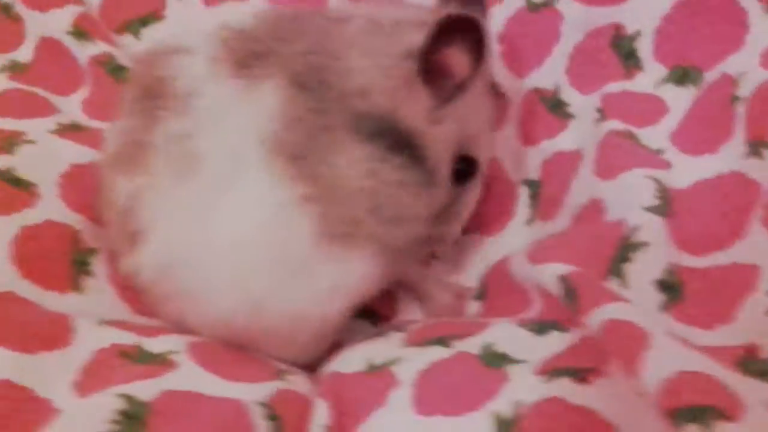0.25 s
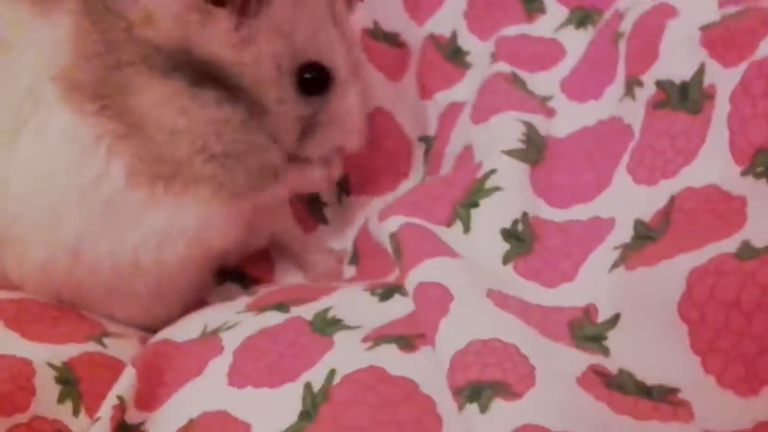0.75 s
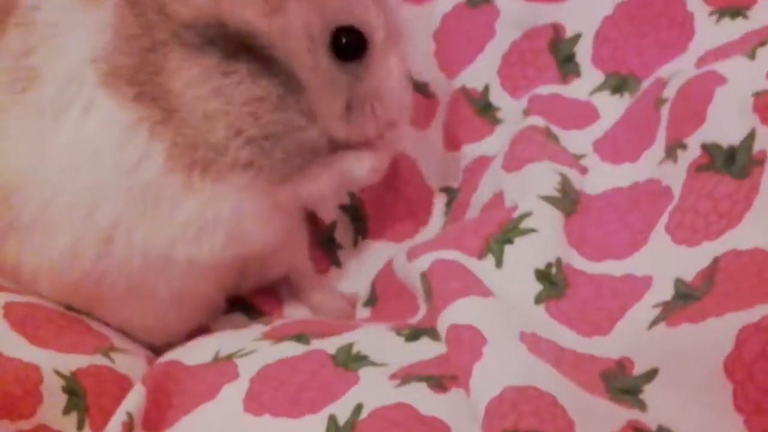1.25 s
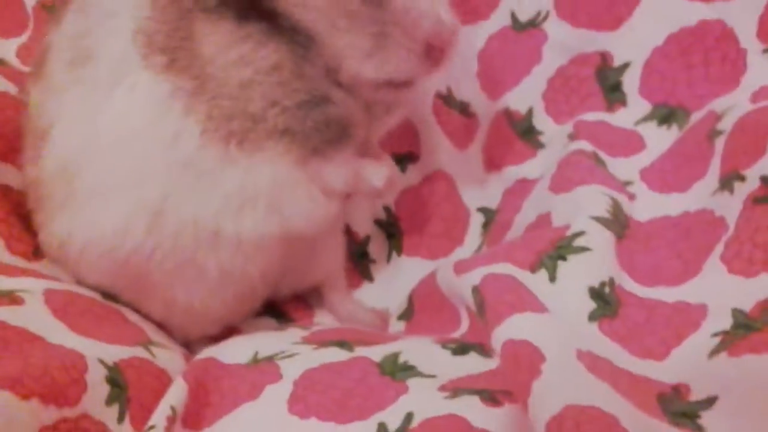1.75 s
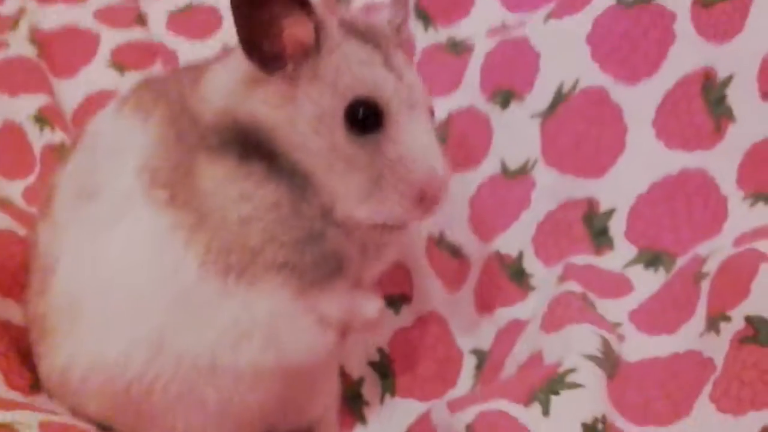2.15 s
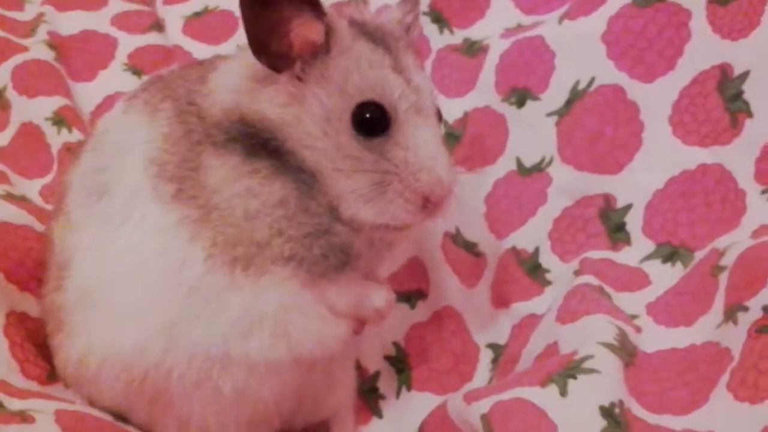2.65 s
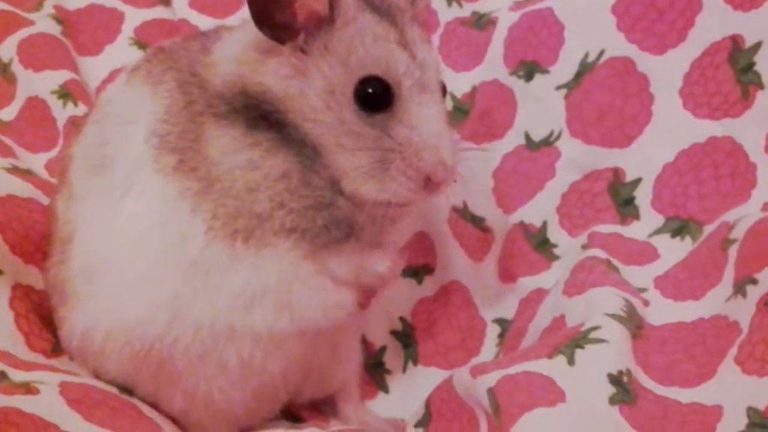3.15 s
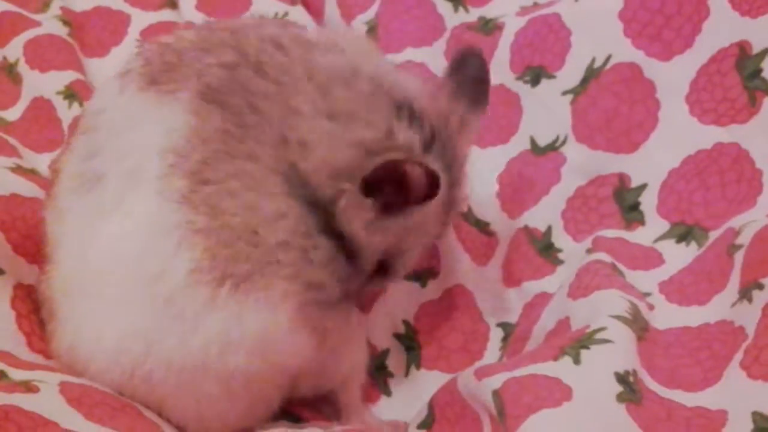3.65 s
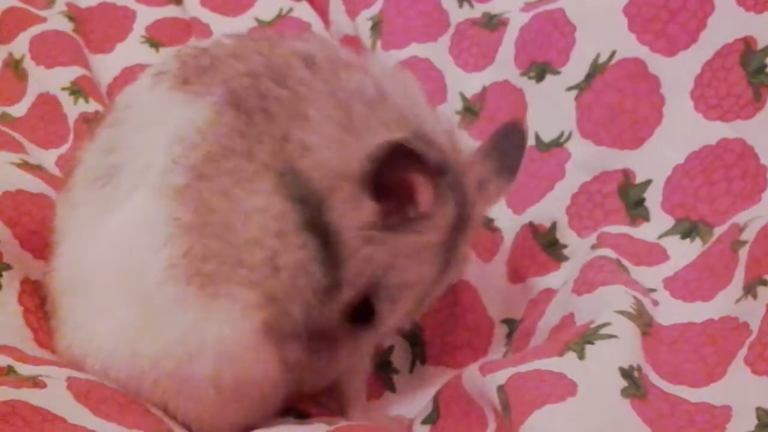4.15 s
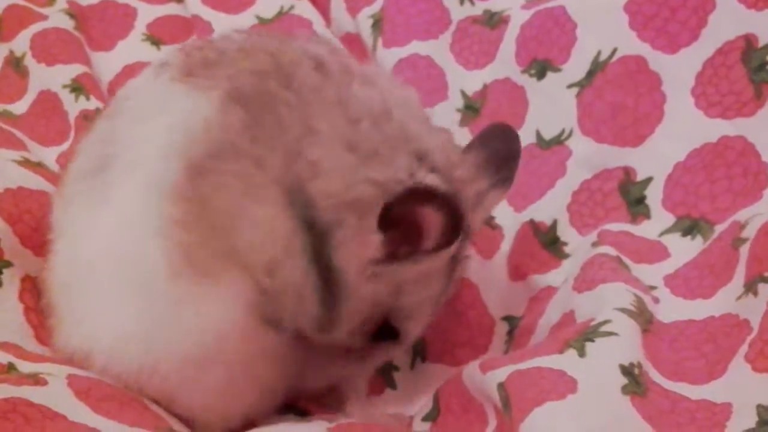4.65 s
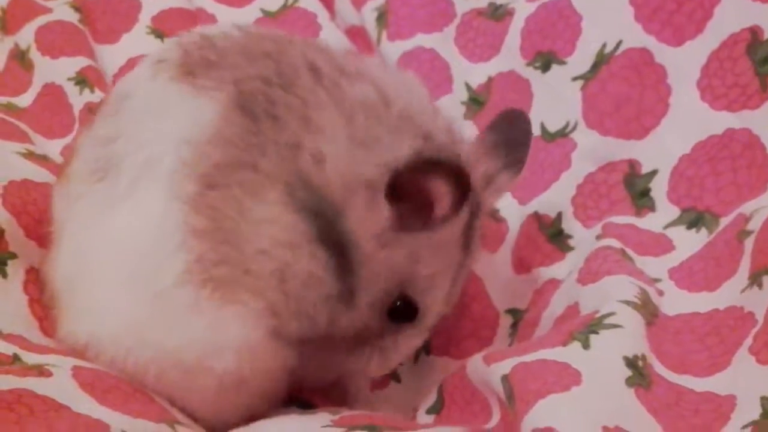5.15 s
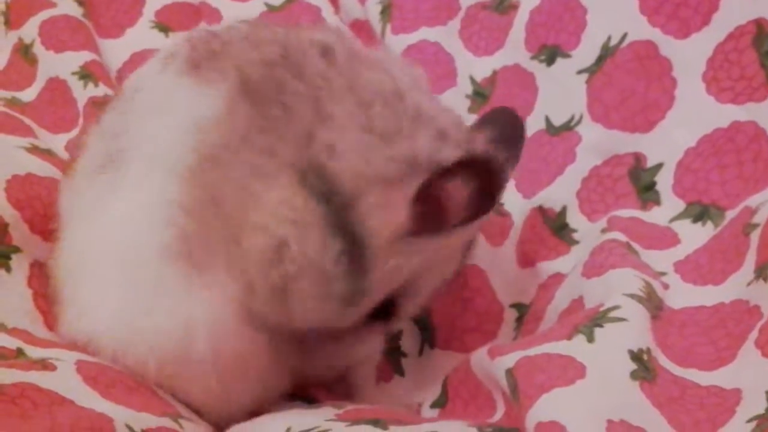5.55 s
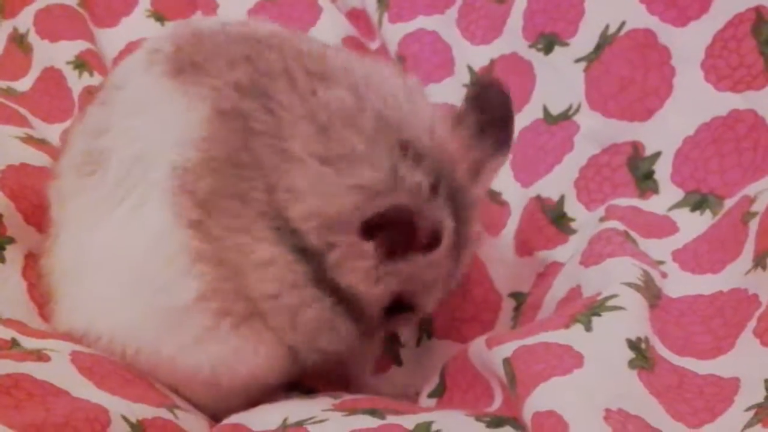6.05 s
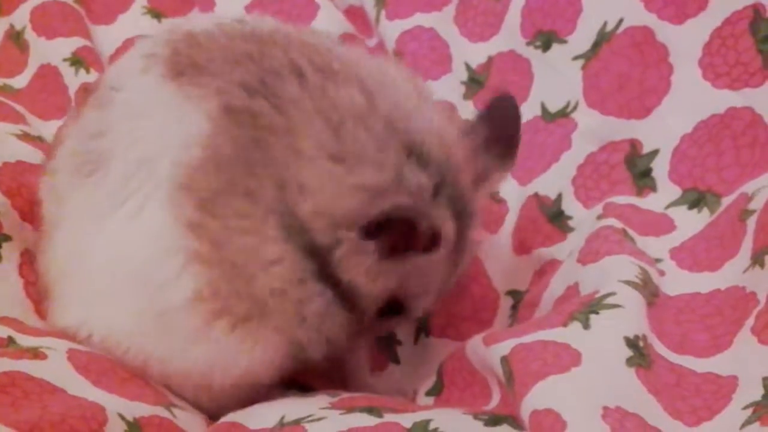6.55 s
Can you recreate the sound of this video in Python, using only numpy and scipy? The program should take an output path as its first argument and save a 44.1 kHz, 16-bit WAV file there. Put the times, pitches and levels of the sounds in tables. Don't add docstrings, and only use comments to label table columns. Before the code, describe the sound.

Very close, dry handling sounds dominate: an opening bump with scraping fabric, irregular plastic clicks and stick-slip creaks, thickening into a rapid crackly creak around two seconds. A faint airy slide trails off. Two hard knocks rattle a loose part, a weaker one follows, then quiet hiss holds a small squeaky wet chirp, another knock and delicate lick clicks from a grooming hamster.

```python
import sys
import numpy as np
from scipy import signal
from scipy.fft import rfft, irfft
from scipy.io import wavfile
from scipy.ndimage import uniform_filter1d, minimum_filter1d

SR = 44100
rng = np.random.default_rng(int(sys.argv[2]) if len(sys.argv) > 2 else 0)


def elevation(decibels):
    levels = np.asarray(decibels, float)
    return 10 ** (levels / 20)


def digitize_waveform(pressure):
    field = np.atleast_2d(pressure).T
    bounded = np.clip(field, -1, 1)
    quanta = np.round(bounded * 32767).astype(np.int16)
    wavfile.write(sys.argv[1], SR, quanta)


N = 299645

# time in seconds, rubbing level in dB, brightness in dB.
RUSTLE = [(0, -33.5, -3.5), (.048, -45.5, 5.5), (.144, -53.5, 7.5), (.25, -61.5, 6.5), (.78, -61, -1),
          (.8, -59, -2.5), (1.145, -62, -4), (1.155, -71, -4), (1.198, -70.5, 4), (1.21, -66.5, 2),
          (1.6, -59.5, -2), (1.62, -63.5, -0.5), (1.755, -61, -4), (1.9, -74, 0), (2.17, -59, 3.5),
          (2.34, -63, 0), (2.49, -70, -11), (2.75, -79.5, -14.5)]
# frequency in Hz, level in dB.
WEAVE = [(71, -50), (120, -17), (235, -8.5), (578, -4.5), (653, -5.5), (1130, -4.5), (2090, 0.5),
         (2780, -3), (4920, -5.5), (5800, -15), (8040, -12), (9860, -22), (15800, -25.5)]
SEAMS_HZ = [1130, 3400, 6000]
# level in dB, share of the brightness (0 to 1).
BANDS = [(-6.5, .1), (-0.06, .01), (-6, 1), (-9.5, 0.31)]
# frequency in Hz, level in dB.
HISS = [(11, -26.5), (18, -5), (28, -22), (70, -21), (101, -15), (324, -20.5), (363, -16.5), (540, -17.5),
        (605, -16.5), (1230, -17), (1380, -15), (3710, -26), (7330, -28), (15800, -28.5)]
HISS_DB = -69.5

# time in seconds, peak level in dB, ring frequency in Hz.
REGRIP = [(.0186, -24, 947.6), (.0306, -22.5, 593), (.041, -40, 675), (.0905, -25, 472), (.178, -38.5, 396),
          (.2727, -37, 770), (.5525, -43, 296), (.5683, -37, 964), (.5803, -36.5, 567), (.6233, -41, 726),
          (.6917, -44.5, 850), (1.5662, -42.5, 668), (1.5767, -39, 620), (1.7518, -42, 564),
          (1.759, -46.5, 736)]
SHIFT = [(.8105, -37.5, 574), (.8337, -34.5, 1007), (.8564, -30.5, 710), (.9215, -27.5, 1050),
         (.9411, -35.5, 830), (.9646, -32, 850), (.9842, -37, 563), (.9973, -35, 775), (1.0176, -37, 512),
         (1.1162, -31.5, 470), (1.1369, -35, 920), (1.2044, -29, 463), (1.2171, -27.5, 520),
         (1.2277, -29.5, 499), (1.2361, -34.5, 403), (1.2465, -36, 380), (1.2544, -41, 447),
         (1.2704, -36.5, 410)]
TIGHTEN = [(1.9022, -49.5, 721), (1.918, -45, 640), (1.9363, -39.5, 373), (1.9449, -36.5, 470),
           (1.9586, -38, 595), (1.9878, -41, 490), (1.9972, -32.5, 740), (2.0047, -42, 550),
           (2.0125, -51, 620), (2.0246, -50, 710), (2.0463, -39.5, 830), (2.0597, -33, 676),
           (2.5465, -36, 536), (2.5606, -40, 627), (2.5675, -32.5, 700), (2.5912, -24, 487),
           (2.6026, -24.5, 700), (2.6114, -35, 815), (2.6152, -37, 578), (2.6699, -42.5, 1306)]
CREAK = [(2.0761, -19.5, 830), (2.0853, -16.5, 844), (2.0907, -28.5, 620), (2.1054, -17.5, 945),
         (2.1159, -16.5, 845), (2.1297, -21, 850), (2.143, -15, 860), (2.152, -18.5, 790),
         (2.1668, -14.5, 980), (2.177, -15.5, 990), (2.1809, -35, 383), (2.2083, -31, 690),
         (2.2177, -34, 540), (2.2241, -29, 610), (2.2275, -32, 620), (2.2448, -21, 740),
         (2.2565, -31.5, 510), (2.2661, -30, 740), (2.2763, -20, 730), (2.2818, -21.5, 780),
         (2.2968, -18.5, 920), (2.3266, -38.5, 810)]
SETTLE = [(2.872, -52, 510), (2.9345, -46, 548), (3.0032, -55, 860), (3.3157, -18.5, 460),
          (3.3801, -32.5, 700), (3.3943, -31.5, 710), (3.5016, -16, 560), (3.5038, -19, 900),
          (3.5056, -24, 727), (3.5182, -30, 700), (3.5484, -29, 650), (3.5514, -22, 870),
          (3.5635, -31.5, 747), (4.2965, -51.5, 790), (4.3738, -33, 553), (4.3767, -25.5, 605),
          (4.3901, -42, 620), (5.5794, -48, 567), (5.7336, -55, 850), (5.7784, -46, 1010),
          (5.8125, -28.5, 650)]
# time in seconds, peak level in dB, ring frequency in Hz.
BUMP = [(.0024, -2, 482)]
# its slips, edge in dB below the ring, rebound in dB below the slip,
# strain (share of the swing), damping (per cycle), final pitch (share of the ring frequency).
GRIPS = [
    (REGRIP, -7, -24.5, 1.9, 2.3, 0.506),
    (SHIFT, -5, -27, 2.8, 1.9, 0.53),
    (TIGHTEN, -12, -20, 2.02, 2.3, 0.55),
    (CREAK, -7, -26, 2.56, 2.1, 0.59),
    (SETTLE, -29, -26.5, 1.1, 1.4, .85),
    (BUMP, -2, -29.5, 2.1, 1.6, 0.63),
]
BLUNT_PER_DB, USUAL_DB = 0.67, -33
UNEVEN_DB = 4
LEAD_S = .0015
REBOUND_S, REBOUND_PITCH = .0036, .85

# time in seconds, peak level in dB, frequency in Hz.
TICKS = [(.0189, -10.5, 4430), (.1748, -30, 1760), (.398, -49, 4490), (.8378, -20, 4450), (.896, -39, 4200),
         (.8962, -50.5, 2400), (1.0372, -30, 4450), (1.132, -41.5, 4800), (1.252, -46.5, 7000),
         (1.554, -40.5, 4500), (1.5845, -44, 5490), (.8095, -41, 4100), (.9212, -40, 4280),
         (1.116, -40, 4600)]
# time in seconds, peak level in dB, frequency in Hz.
THUMPS = [(.0023, -10.5, 350), (0.0016, -13.5, 4000), (3.3345, -29, 650), (6.098, -60, 900),
          (.546, -39, 160), (.838, -27, 1700), (1.3905, -40.5, 1390), (4.3735, -31, 350),
          (3.3135, -37.5, 176), (4.3832, -41, 870), (5.2405, -29, 2490), (5.8118, -41, 520),
          (7, -47.5, 1300)]
# time in seconds, peak level in dB, frequency in Hz.
LICKS = [(5.237, -52, 1485), (5.2375, -53, 2883), (6.089, -49, 3550), (6.0892, -44.5, 4580),
         (6.0894, -56, 5600), (6.089, -55, 2698), (6.4645, -51.5, 3840), (6.4646, -47.5, 4610),
         (6.4646, -55, 5370), (6.715, -64, 4360)]
# its hits, cycles to die 60 dB, rise in seconds,
# click in dB below the ring, click band edges (shares of the pitch).
MATERIALS = [
    (TICKS, 24, 0.00037, -6.5, (.9, 1.9)),
    (THUMPS, 3.8, .0003, -25, (1.5, 6.5)),
    (LICKS, 42, 0.00053, -3, (0.26, 0.94)),
]

# start in seconds, length in seconds, level in dB, centre in Hz.
BRUSHES = [(.003, .06, -45, 4300), (.09, 0.094, -51.5, 7400), (1.123, 0.015, -69, 4500),
           (1.7, 0.045, -68, 6430), (2.193, 0.029, -58.5, 6070), (2.287, 0.025, -52, 5500),
           (2.561, 0.014, -59, 4730), (3.5, .012, -78, 7500), (3.545, .008, -66, 6000)]
# start in seconds, length in seconds, start level in dB, end level in dB.
SCRAPES = [(.004, 0.053, -33, -38.5), (0.053, 0.17, -35.5, -65), (1.118, 0.026, -65, -52),
           (1.203, 0.077, -53, -67), (1.936, 0.094, -61, -57.5), (2.051, 0.12, -50.5, -49.5),
           (2.166, 0.1, -46, -45), (2.269, 0.064, -40.5, -52), (2.55, 0.05, -54, -42),
           (2.601, 0.023, -39, -57)]
# frequency in Hz, level in dB.
SCRAPE = [(59, -42.5), (100, -18), (307, 1.5), (727, -4), (2570, -9.5), (3990, -22.5), (5070, -29),
          (6320, -33.5), (12000, -39.5), (15600, -71), (22000, -120)]
# start in seconds, length in seconds, start level in dB, end level in dB.
RATTLES = [(3.311, 0.041, -46, -53.5), (3.376, .027, -34.5, -49.5), (3.502, .031, -26, -58.5),
           (3.533, 0.024, -66, -50.5), (3.546, 0.022, -34, -48), (4.375, 0.018, -37, -63),
           (5.81, 0.014, -52, -63)]
RATTLE_HZ, RATTLE_WIDTH_HZ, RATTLE_DB = 770, 120, 2.5

# time in seconds, resonance in Hz, level in dB.
SWISH = [
    (2.328, 2714, -82.5),
    (2.361, 2717, -61.5),
    (2.45, 2570, -66),
    (2.53, 2404, -68.5),
    (2.558, 2380, -79),
]
# time in seconds, pitch in Hz, peak level in dB.
SQUEAK = [(5.244, 3500, -52), (5.2465, 2716, -43.5), (5.25, 1950, -42), (5.256, 1798, -46),
          (5.257, 1385, -46.5), (5.2632, 1320, -47.5), (5.266, 2180, -36.5), (5.271, 2230, -37),
          (5.274, 1685, -57)]
# pitch in Hz, octave level in dB.
LOW_REGISTER = [(1400, -8.5), (1800, -27)]


def evened(x):
    return x / np.sqrt(np.mean(x ** 2) + 1e-20)


def add(mix, s, sound):
    part = mix[max(round(s * SR), 0):][:len(sound)]
    part += sound[:len(part)]


def coloured(x, points):
    hz, db = np.transpose(points)
    bins = np.fft.rfftfreq(len(x), 1 / SR)
    gain = elevation(np.interp(np.log(bins + 1), np.log(hz + 1), db))
    return evened(irfft(rfft(x) * gain, len(x)))


def resonate(x, hz, width):
    r = np.exp(-np.pi * width / SR)
    return 2 * signal.lfilter([1 - r], [1, -r * np.exp(2j * np.pi * hz / SR)], x).real


def grains(per_s, spread_db):
    size = elevation(spread_db * np.minimum(rng.exponential(1, N), 4))
    sign = rng.choice([-1., 1.], N)
    return size * sign * (rng.random(N) < per_s / SR)


def strokes(rows):
    level = np.zeros(N)
    for s, length, start_db, end_db in rows:
        steps = round(length * SR)
        fade = elevation(np.linspace(start_db, end_db, steps))
        add(level, s, fade * signal.windows.tukey(steps, .15))
    return level


def rustle():
    s, rub_db, bright_db = np.transpose(RUSTLE)
    t, hz = np.arange(N) / SR, np.fft.rfftfreq(N, 1 / SR)
    flicker = elevation(1.5 * evened(uniform_filter1d(rng.standard_normal(N), 700)))
    fibres = rfft(coloured(grains(9000, 2.5) * flicker, WEAVE))
    below = [0 * hz] + [1 / (1 + (hz / seam) ** 6) for seam in SEAMS_HZ] + [1 + 0 * hz]
    out = np.zeros(N)
    for (db, share), passed in zip(BANDS, np.diff(below, axis=0)):
        band = evened(irfft(fibres * passed, N))
        level_db = np.interp(t, s, rub_db + db + share * bright_db, right=-120)
        out += elevation(level_db) * band
    return out


def suppressor(events):
    open_db, soft_db, lift_db = -55, 4, 7
    power_db = 10 * np.log10(abs(uniform_filter1d(events ** 2, 90)) + 1e-12)
    held_db = -minimum_filter1d(-power_db, size=1150, origin=400)
    opened = 1 / (2 + np.exp((open_db - held_db) / soft_db))
    return elevation(lift_db * uniform_filter1d(opened, 150))


def hiss(events):
    return elevation(HISS_DB) * coloured(rng.standard_normal(N), HISS) * suppressor(events)


def slip(hz, edge_db, chance, load, damp, end):
    t = np.arange(500) / SR
    start, sag = 1.1, 4.7
    turns = np.cumsum(hz * (end + (start - end) * np.exp(-t * hz * sag))) / SR
    swing = -np.sin(2 * np.pi * turns) * np.exp(-damp * hz * t)
    strain = load * np.exp(-t[60:0:-1] / 0.00028 * hz / 700)
    let_go = load * np.exp(-t * hz * 18)
    body = np.concatenate([strain, let_go + swing / abs(swing).max()])
    top_hz = np.clip(5 * hz * elevation(0.79 * (edge_db + 33.5)), 500, 4500)
    body = signal.sosfiltfilt(signal.butter(2, top_hz, fs=SR, output="sos"), body, padlen=0)
    body = signal.sosfilt(signal.butter(2, .3 * hz, "high", fs=SR, output="sos"), body)
    crack = (.4 * chance - 2 * (t == 0)) * np.exp(-t / 0.00091)
    crack = np.concatenate([np.zeros(60), crack])
    edge = np.zeros(len(crack))
    for mode_hz, share in [(3000, 0.99), (5000, 0.48), (6700, 0.19)]:
        edge += share * resonate(resonate(crack, mode_hz, 2000), mode_hz, 2000)
    edge = signal.sosfilt(signal.butter(3, 7500, fs=SR, output="sos"), edge)
    return body / abs(body).max() + elevation(edge_db - 4) * edge / abs(edge).max()


def case():
    out = np.zeros(N)
    for slips, edge_db, rebound_db, *feel in GRIPS:
        way = -1 if slips in (SETTLE, BUMP) else 1
        for s, db, hz in slips:
            chance = rng.standard_normal(500)
            blunt_db = BLUNT_PER_DB * (db - USUAL_DB)
            sharp_db = edge_db - blunt_db + UNEVEN_DB * np.tanh(chance[-1])
            jump = slip(hz, sharp_db, chance, *feel)
            rebound = slip(hz * REBOUND_PITCH, sharp_db, chance[::-1], *feel)
            add(out, s - LEAD_S, way * elevation(db) * jump)
            add(out, s - LEAD_S + REBOUND_S, way * elevation(db + rebound_db) * rebound)
    return out


def ticks():
    out, t = np.zeros(N), np.arange(1800) / SR
    for hits, cycles, rise_s, click_db, shares in MATERIALS:
        for s, db, hz in hits:
            decay = elevation(db - 60 * t * hz / cycles)
            ring = decay * np.sin(2 * np.pi * hz * t) * (1 - np.exp(-t / rise_s))
            band_hz = np.minimum(np.multiply(shares, hz), .45 * SR)
            band = signal.butter(2, band_hz, "band", fs=SR, output="sos")
            click = signal.sosfilt(band, rng.standard_normal(1800) * np.exp(-t / .0005))
            add(out, s, 1.5 * ring + elevation(db + click_db) * click / abs(click).max())
    return out


def brushes():
    out = np.zeros(N)
    for s, length, db, hz in BRUSHES:
        steps = round(length * SR)
        air = resonate(resonate(rng.standard_normal(steps), hz, .7 * hz), hz, .7 * hz)
        add(out, s, elevation(db) * evened(air) * signal.windows.tukey(steps, .6))
    return out


def scrapes():
    scrape = coloured(grains(3600, 3.21), SCRAPE)
    loose_part = resonate(scrape, RATTLE_HZ, RATTLE_WIDTH_HZ)
    rattle = evened(scrape + elevation(RATTLE_DB) * loose_part)
    return strokes(SCRAPES) * scrape + strokes(RATTLES) * rattle


def swish():
    s, hz, db = np.transpose(SWISH)
    t = np.arange(s[0], s[-1], 1 / SR)
    turn, out = 2 * np.pi * np.cumsum(np.interp(t, s, hz)) / SR, np.zeros(N)
    slow = rng.standard_normal((4, len(t)))
    slow = uniform_filter1d(uniform_filter1d(slow, size=70), size=70)
    upper = slow[0] * np.cos(turn) + slow[1] * np.sin(turn)
    lower = slow[2] * np.cos(turn / 2) + slow[3] * np.sin(turn / 2)
    add(out, s[0], elevation(np.interp(t, s, db)) * evened(upper + 0.53 * lower))
    return out


def squeak():
    s, *columns = np.transpose(SQUEAK)
    t = np.arange(s[0], s[-1], 1 / SR)
    hz, db = (np.interp(t, s, column) for column in columns)
    octave_db = np.interp(hz, *np.transpose(LOW_REGISTER))
    shake = evened(uniform_filter1d(rng.standard_normal((2, len(t))), size=25))
    turn, out = 2 * np.pi * np.cumsum(hz * (1 + 0.027 * shake[0])) / SR, np.zeros(N)
    octave = elevation(octave_db) * np.sin(2 * turn) * (1 + .5 * shake[1])
    tone = np.sin(turn) + octave
    fizz = evened(resonate(resonate(rng.standard_normal(len(t)), 2000, 2200), 1900, 2180))
    add(out, s[0], elevation(db) * tone + elevation(-62) * fizz)
    return out


def scene():
    port = signal.butter(4, 140, "high", fs=SR, output="sos")
    events = signal.sosfilt(port, case() + ticks() + scrapes() + squeak())
    return (rustle() + hiss(events) + events + brushes() + swish())[None]


def top_cut(x):
    return signal.sosfilt(signal.butter(12, 15910, fs=SR, output="sos"), x)


def record(dry):
    ceiling, offset = .93, -.0004
    mix = np.clip(dry, -ceiling, ceiling) + offset
    return top_cut(mix)


dry = scene()
out = record(dry)
digitize_waveform(out)
```